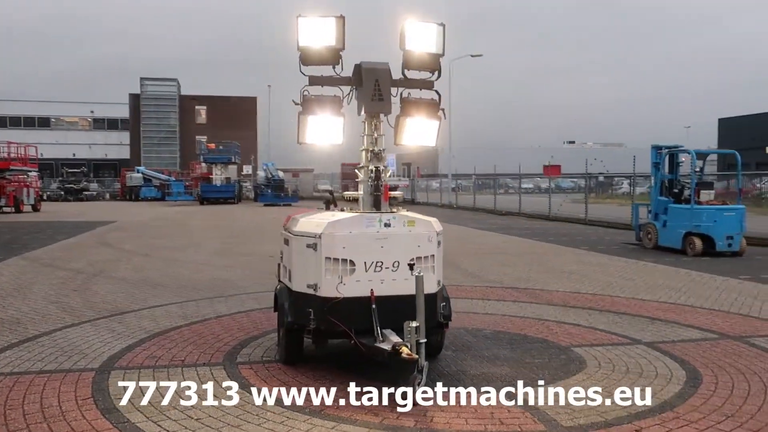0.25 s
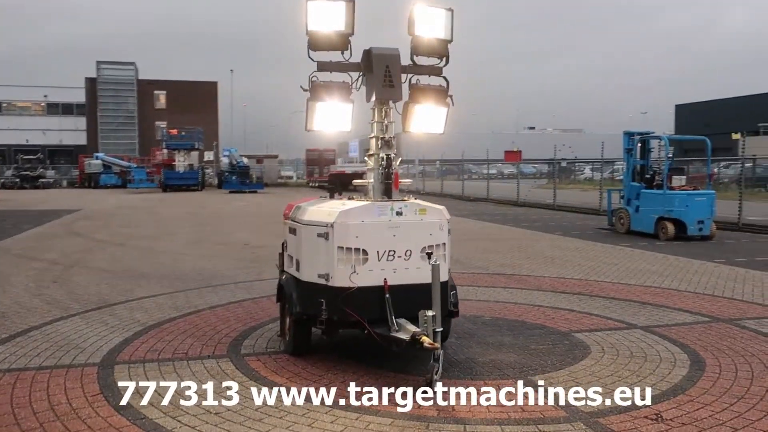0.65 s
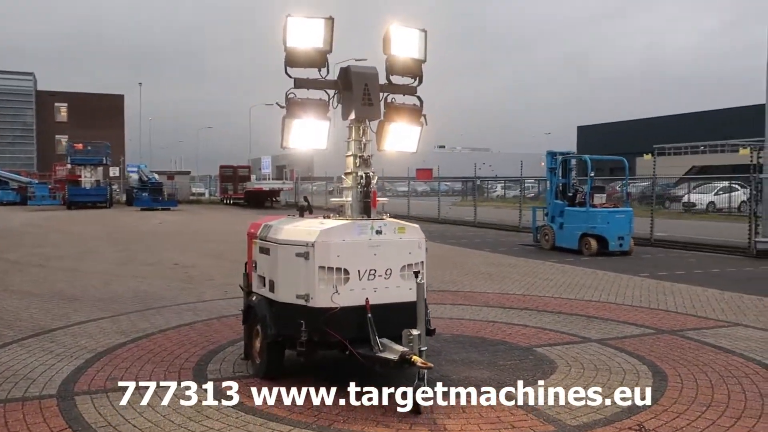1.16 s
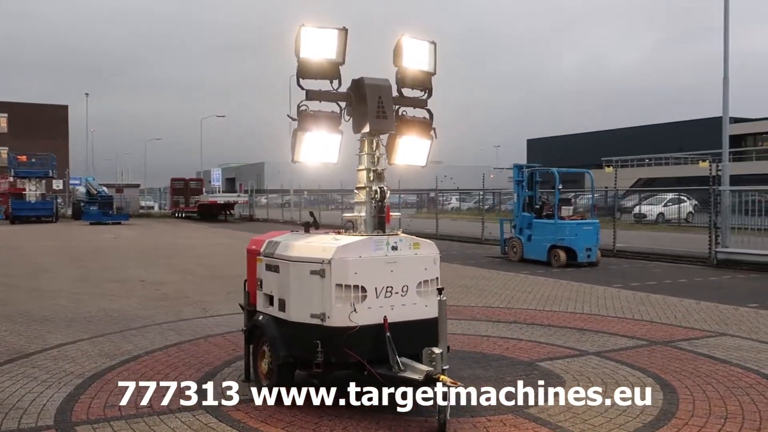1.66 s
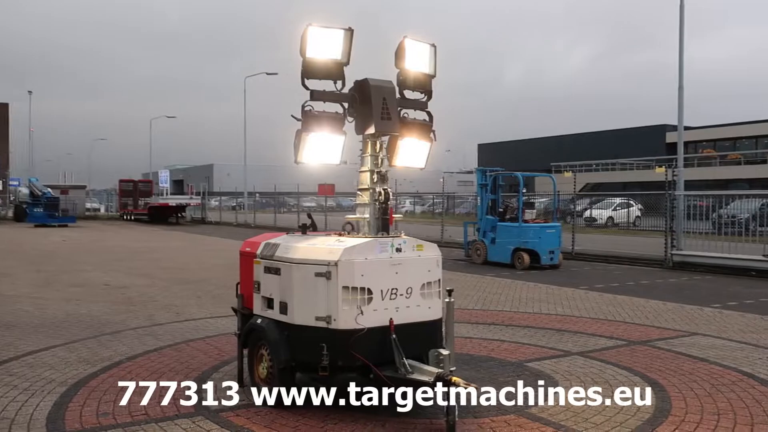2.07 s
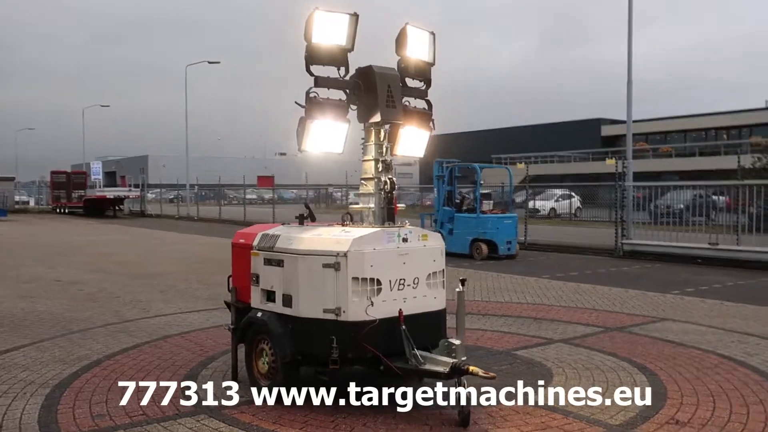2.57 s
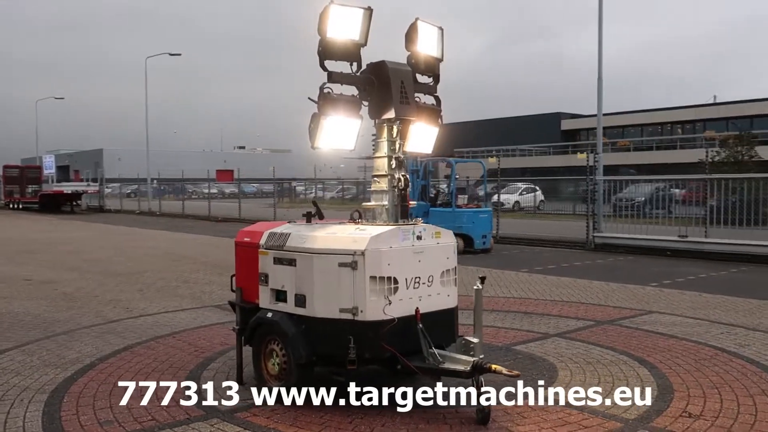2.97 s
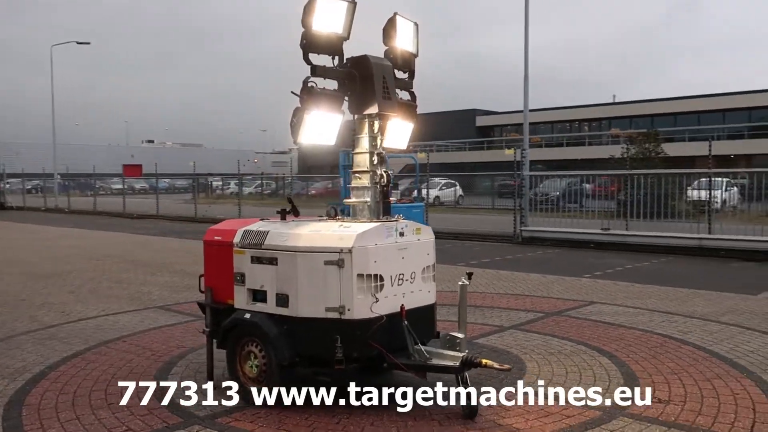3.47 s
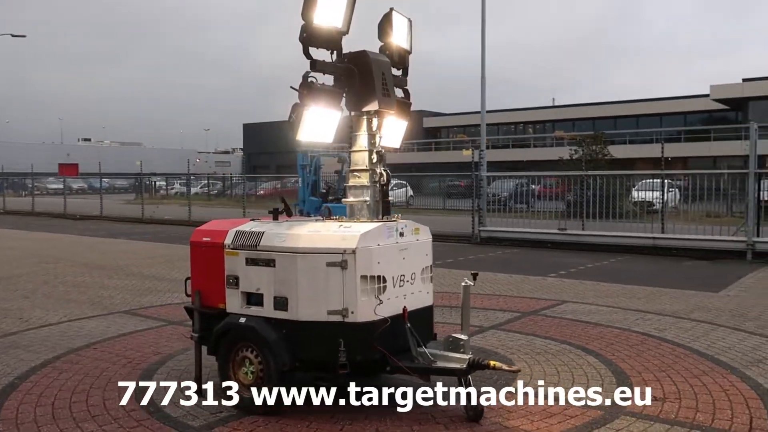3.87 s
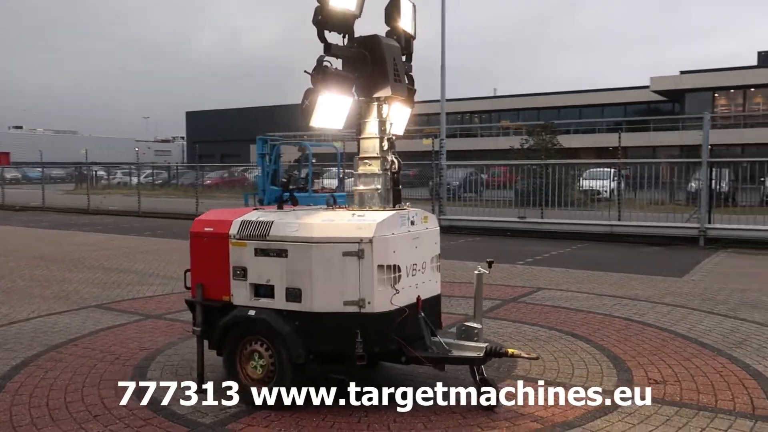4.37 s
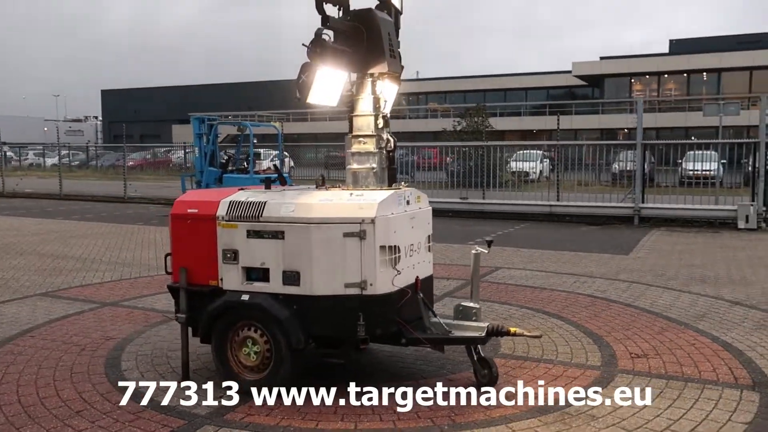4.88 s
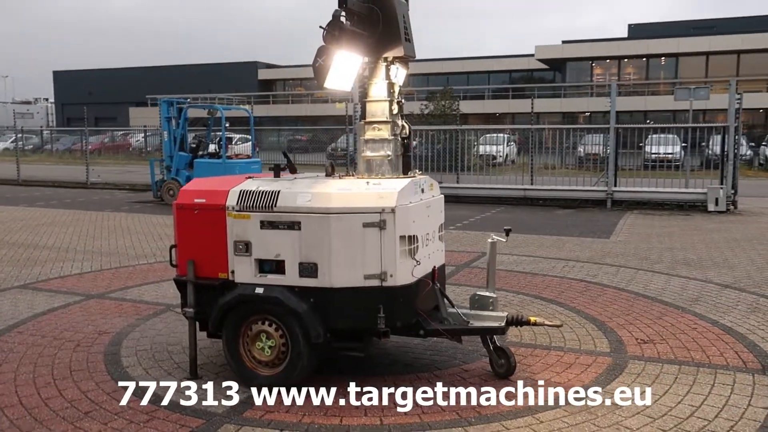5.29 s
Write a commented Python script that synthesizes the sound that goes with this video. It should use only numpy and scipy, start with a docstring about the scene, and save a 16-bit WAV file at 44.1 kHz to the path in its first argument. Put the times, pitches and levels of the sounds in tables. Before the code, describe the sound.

In an open yard, the small diesel of a towed light tower runs continuously at constant speed. Its buzzing low drone pulses about twenty-five times a second, with metallic ticking, knocks and hood drumming over a low rush of cooling air. A handheld stereo microphone moves slowly from front to side, gently shifting the tone and clatter.

```python
"""Diesel light tower at governed speed

The small diesel of a mobile light tower runs in an open yard, firing about 25 times a second.
Exhaust and intake pulses sum to harmonics of the firing rate, and sheet-metal hood panels resonate on them.
Each firing also modulates noise into clatter, drumming, ticks and knocks, over hiss and the rush of cooling air.
The microphone is carried slowly from the front round to the side, which shifts the levels and colours."""
import sys
import numpy as np
from scipy import signal
from scipy.fft import rfft, irfft
from scipy.io import wavfile

SR = 44100
rng = np.random.default_rng(int(sys.argv[2]) if len(sys.argv) > 2 else 0)


def master(y):
    """Save y as 16-bit WAV."""
    cut = np.clip(np.atleast_2d(y).T, -1, 1)
    pcm = np.round(cut * 32767)  # scale
    wavfile.write(sys.argv[1], SR, pcm.astype(np.int16))


N = 243873
TIME = np.arange(N) / SR  # s
HZ = np.fft.rfftfreq(N, 1 / SR)
STROKES = 145  # engine cycles for which random values are drawn; one firing in each cycle

# the governor hunts slightly about its set speed: time_s, firing_rate_hz
GOVERNED_SPEED = [(0.0, 24.98), (0.48, 24.997), (0.7, 24.952), (1.35, 25.003), (1.9, 24.994), (3.0, 24.946),
                  (3.5, 24.942), (3.85, 25.01), (4.2, 24.988), (4.55, 24.947), (5.0, 25.013), (5.53, 24.99)]
# the walk round the trailer: time_s, place (0 front, 1 corner, 2 side)
WALK_PATH = [(.7, 0.22), (1.3, 1.0), (2.25, 1.116), (3.2, 1.69)]
# nearness of the engine, told by the level of its clatter; only departures from the mean act: time_s, level_db
ENGINE_NEARNESS = [(0.15, -38), (0.8, -38), (1.3, -36), (2.2, -38), (3.2, -37), (3.8, -37.5), (4.3, -37),
                   (5.3, -37)]


def gain_of(db):
    """Level to amplitude: 20 dB is a factor of ten."""
    return 10 ** (np.asarray(db) / 20)


def evened(x):
    """Normalisation to unit rms, so that a later gain alone sets the level."""
    return x / np.sqrt(np.mean(x ** 2) + 1e-20)


def curve(rows, column=1):
    """Linear interpolation of one column of a timed table at every sample."""
    rows = np.asarray(rows)
    return np.interp(TIME, rows[:, 0], rows[:, column])


def read(points):
    """Interpolation of a spectrum table on a logarithmic frequency axis."""
    hz, value = np.transpose(points)
    return np.interp(np.log(HZ + 1), np.log(hz + 1), value)


def drift(rate_hz):
    """Low-pass filtered noise of unit rms; its spectrum falls to half amplitude at rate_hz."""
    points = 1024
    hz = np.fft.rfftfreq(points, TIME[-1] / points)
    slow = irfft(rfft(rng.standard_normal(points)) / (1 + (hz / rate_hz) ** 4))
    return evened(np.interp(TIME, np.linspace(0, TIME[-1], points), slow))


def strokes(cycles):
    """Cyclic variation: an independent normal value at each stroke, joined by straight lines."""
    return np.interp(cycles + 1, np.arange(STROKES), rng.standard_normal(STROKES))


def lobe(middle_s, length_s):
    """Directivity: one cosine arch of gain between two silent angles."""
    return np.cos(np.pi * np.clip((TIME - middle_s) / length_s, -.5, .5))


def nearness_gain(db_per_db):
    """Distance law: gain follows the departure of the nearness from its mean."""
    near_db = curve(ENGINE_NEARNESS)
    return gain_of(db_per_db * (near_db - near_db.mean()))


def carried(layer_carry):
    """Directivity and distance: the side facing the microphone and the nearness set a layer's gain."""
    front_db, corner_db, side_db, db_per_db = layer_carry
    facing_db = np.interp(curve(WALK_PATH), [0, 1, 2], [front_db, corner_db, side_db])
    return gain_of(facing_db) * nearness_gain(db_per_db)


def spread(pair, colour):
    """Partial coherence: two unrelated signals are coloured and become the middle and side of a stereo pair."""
    # left-right likeness: frequency_hz, likeness (0-1)
    likeness = [(100, 0.86), (600, 1), (1400, 0.93), (3000, 0.92), (5000, 0.49), (9000, 0.13),
                (14000, 0.31)]
    # left minus right: frequency_hz, difference_db
    balance = [(100, -4.5), (600, 1), (1300, 2.5), (2500, 0.5), (5000, 1.1), (14000, .1)]
    same = read(likeness)
    mid, side = rfft(pair) * gain_of(read(colour))
    side = side * np.sqrt((1 - same) / (1 + same))
    lean = gain_of(read(balance) / 2)
    channels = irfft(np.array([(mid + side) * lean, (mid - side) / lean]), N)
    return channels / np.std(channels.mean(0))


def rattle(cycles, blows, repeat, memory, uneven_db, between=1):
    """Cyclostationary noise: blows raise the power of a partly repeating noise in each engine cycle.

    repeat is the repeating share of power, memory its lifetime in cycles, between the power between blows."""
    number, place = np.floor(cycles).astype(int) + 1, cycles % 1
    fresh = rng.standard_normal((2, N))
    ringing = rng.standard_normal((2, STROKES, 1766))
    keep = np.exp(-1 / memory)
    for k in range(1, STROKES):
        ringing[:, k] = keep * ringing[:, k - 1] + np.sqrt(1 - keep ** 2) * ringing[:, k]
    pattern = ringing[:, number, (place * ringing.shape[2]).astype(int)]
    power = np.full(N, float(between))
    for at, strength, decay in blows:
        stroke = np.floor(cycles - at).astype(int) + 1
        force = gain_of(uneven_db * rng.standard_normal(STROKES))[stroke]
        power += strength * force ** 2 * np.exp(-((cycles - at) % 1) / decay)
    return np.sqrt(power) * (np.sqrt(repeat) * pattern + np.sqrt(1 - repeat) * fresh)


def pipe(table, orders, skirt_db, trail, linger=0, box_lag=0):
    """Fourier synthesis of one cycle of a pipe's ringing: its harmonic levels also govern its phase lags.

    trail is 1 as after a click and 0 when the ringing swells and fades alike."""
    linger_above = 7  # orders above this one ring on in the hood
    size = gain_of(np.array(table)[orders - 1, 1])
    log_gain = np.full(65, np.log(gain_of(skirt_db) * size.max()))
    log_gain[orders] = np.log(size)
    # the Hilbert transform of the log gain gives the minimum-phase lag;
    # the valve opens gradually, so the ringing trails less than after a click
    both_sides = np.r_[log_gain, log_gain[-2:0:-1]]
    lag = trail * signal.hilbert(both_sides).imag[orders]
    lag = lag + box_lag + linger * np.maximum(orders - linger_above, 0) ** 3
    turn = np.arange(1024) / 1024
    return size @ np.cos(2 * np.pi * np.outer(orders, turn) - lag[:, None])


def intake_and_exhaust(cycles):
    """Harmonic radiation by pulsed flow: each cycle the exhaust booms, then the intake sucks with a thump."""
    # levels of the orders from five sides, front to side: order (multiple of the firing rate), relative_db
    from_front = [(1, -17), (2, -8), (3, -6), (4, -19), (5, -7), (6, 0), (7, -4), (8, -5), (9, -9),
                  (10, -10), (11, -22)]
    from_corner = [(1, -15), (2, -4), (3, 0), (4, -19), (5, -8), (6, 0), (7, -5), (8, -11), (9, -17),
                   (10, -11), (11, -21)]
    from_door = [(1, -19), (2, -5), (3, -2), (4, -22), (5, -3), (6, 0), (7, -6), (8, -10), (9, -12),
                 (10, -15), (11, -31)]
    from_wheel = [(1, -22), (2, -7), (3, -9), (4, -20), (5, -8), (6, 0), (7, -7), (8, -11), (9, -16),
                  (10, -29), (11, -30)]
    from_side = [(1, -20), (2, -5), (3, -5), (4, -18), (5, -5), (6, 0), (7, -8), (8, -8), (9, -14),
                 (10, -24), (11, -24)]
    # the note from each side: time_s, level_db (before nearness and load),
    # thump_trail (0-1), linger (rad per cubed order)
    pipe_views = [(.45, -13.4, .75, .13), (1.5, -15.2, .3, .08), (2.8, -15.3, .35, .09),
                  (4.1, -15.3, .35, 0), (5.3, -14.5, .35, 0)]
    exhaust_opens, intake_opens = .105, .335  # place in the cycle, 0-1
    intake_lead = 0.014  # cycles per place of the walk: the intake is heard earlier from the side
    airbox_lag = 0.95  # rad: the air box delays the swing of the thump under its swell
    boom_uneven, thump_uneven = .11, .05  # share of strength
    stroke_jitter = .003  # cycles
    times, levels_db, trails, lingers = np.transpose(pipe_views)
    boom_at = cycles - exhaust_opens + stroke_jitter * strokes(cycles)
    thump_at = cycles - intake_opens + intake_lead * curve(WALK_PATH) + stroke_jitter * strokes(cycles)
    boom_force = 1 + boom_uneven * strokes(cycles)
    thump_force = 1 + thump_uneven * strokes(cycles - intake_opens)
    out = np.zeros(N)
    for view, table in enumerate([from_front, from_corner, from_door, from_wheel, from_side]):
        boom = pipe(table, np.arange(1, 4), skirt_db=-15, trail=.16)
        thump = -pipe(table, np.arange(4, 12), skirt_db=-35, trail=trails[view],
                      linger=lingers[view], box_lag=airbox_lag)
        turn = np.arange(len(boom)) / len(boom)
        note = boom_force * np.interp(boom_at, turn, boom, period=1)
        note += thump_force * np.interp(thump_at, turn, thump, period=1)
        facing = np.interp(TIME, times, np.arange(len(times)) == view)
        out += facing * gain_of(levels_db[view]) * evened(note)
    load = 1 + .025 * drift(2.9)  # slow wavering
    return out * nearness_gain(.29) * load


def throb(cycles, hz):
    """Amplitude modulation by damping: high panel notes die away between firings, low ones ring through."""
    depth = 0.36 * hz / 1e3
    loudest = 0.18  # place in the cycle, 0-1
    return evened(1 + depth * np.cos(2 * np.pi * (cycles - loudest)))


def panel_rings(cycles):
    """Forced resonance: hood panels ring on multiples of the firing rate, each within its own lobe."""
    # lobes that the microphone walks through: middle_s, length_s, frequency_hz (before rounding to the
    # nearest multiple), level_db (rms at the top of the arch)
    panel_lobes = [(1.8, 1.0, 275, -40.0), (0.2, 1.6, 300, -35), (1.55, 1.6, 300, -33),
                   (3.4, 1.8, 300, -39.5), (0.4, 2.2, 325, -32.5), (1.85, 1.9, 325, -30.5),
                   (4.1, 3.4, 325, -41.5), (1.15, 1.4, 350, -35.5), (2.3, 1.4, 350, -32.5),
                   (5.3, 4.4, 350, -41.0), (0.3, 2.8, 375, -42.0), (0.0, 1.2, 400, -38.5),
                   (1.5, 1.0, 400, -42.5), (0.9, 3.2, 425, -39.5), (4.5, 1.6, 425, -44.0),
                   (2.3, 4.4, 450, -39.5), (5.2, 3.0, 450, -41.0), (1.8, 3.0, 475, -39.0),
                   (1.2, 2.8, 500, -39.5), (5.4, 4.4, 500, -39.0), (0.6, 4.4, 550, -42.5),
                   (5.2, 3.2, 550, -41.0), (0.4, 4.4, 575, -36.5), (3.0, 2.2, 575, -42.5),
                   (5.5, 3.8, 575, -37.0), (2.3, 4.4, 650, -41.5), (5.3, 3.2, 650, -41.5),
                   (2.4, 4.4, 675, -39.5), (5.0, 2.0, 675, -41.0), (0.5, 4.4, 700, -35.5),
                   (3.7, 3.6, 700, -41.0), (1.2, 1.4, 725, -43.0), (3.9, 4.2, 725, -45.0),
                   (5.5, 2.0, 750, -41.0), (4.4, 2.0, 775, -42.5), (1.6, 2.4, 800, -41.5),
                   (5.5, 4.4, 800, -45.5), (2.8, 3.2, 825, -45.0), (2.1, 2.0, 850, -45.5),
                   (5.5, 4.4, 875, -44.5), (1.8, 2.2, 900, -46.0), (1.8, 4.4, 925, -45.0),
                   (4.35, 0.78, 1673, -43.5), (5.07, 0.8, 1673, -44.0)]
    struck = .4  # place in the cycle, 0-1
    waver, scatter = .17, 1.2  # rad: change from stroke to stroke, spread of starting phases
    firing_hz = np.mean(curve(GOVERNED_SPEED))
    tones = np.zeros(N)
    for middle_s, length_s, hz, db in panel_lobes:
        heard = abs(TIME - middle_s) < length_s / 2
        turn = cycles[heard]
        angle = 2 * np.pi * round(hz / firing_hz) * (turn - struck)
        angle += waver * strokes(turn) + scatter * rng.standard_normal()
        swell = lobe(middle_s, length_s)[heard] * throb(turn, hz)
        tones[heard] += gain_of(db) * swell * np.cos(angle)
    return np.sqrt(2) * tones


def raps(cycles):
    """Impulsive excitation: raps of injection and combustion swell and die at one place in every cycle."""
    # each is heard through one opening of the hood: middle_s, length_s, place (in the cycle, 0-1),
    # frequency_hz (at the starting speed), peak_db (for a stroke of mean strength)
    hard_raps = [(1.15, 2.0, .21, 2750, -35), (.6, 2.0, .26, 1600, -35), (1.8, 1.2, .18, 2450, -41),
                 (3.4, 1.3, .29, 1600, -40), (4.7, 2.0, .24, 1630, -31.5), (4.8, 1.6, .49, 1620, -36),
                 (4.9, 1.9, .16, 2600, -40)]
    rise, uneven, jitter = .05, .2, .0012  # swell time in cycles, share of strength, cycles
    out = np.zeros(N)
    for middle_s, length_s, place, hz, db in hard_raps:
        since = (cycles - place) % 1
        stroke = np.floor(cycles - place).astype(int) + 1
        force, slip = rng.standard_normal((2, STROKES))[:, stroke]
        swell = since / rise * np.exp(1 - since / rise) * (1 + uneven * force)
        tone = np.sin(2 * np.pi * hz * (since + jitter * slip) / GOVERNED_SPEED[0][1])
        out += gain_of(db) * lobe(middle_s, length_s) * swell * tone
    return out


def ticks_and_knock(cycles):
    """Impact noise: injector and valves tick sharply, the block answers combustion with a short ringing knock."""
    # blows in each cycle: place (0-1), power (relative), decay_cycles
    tick_blows = [(.2, .5, .09), (.25, .7, .11), (.47, .35, .17)]
    knock_blows = [(.26, 0.61, 0.16), (.54, 0.44, 0.11)]
    # what they ring with: frequency_hz, relative_db
    tick_colour = [(1200, -9), (2100, -1), (2480, 7.5), (2800, 3), (3050, -1), (3550, -2.5), (3880, 2.5),
                   (4300, -11.5), (7000, -18), (14000, -44)]
    knock_colour = [(1000, -37), (1380, -27), (1500, 10), (1600, -12.5), (1740, -6), (1900, 0), (2400, -39)]
    # escape through the vents toward the microphone: time_s, ticks_db, knock_db
    vent_levels = [(.2, -49.5, -50), (1.2, -47.5, -49), (2.0, -49.5, -53), (2.75, -47, -55),
                   (3.2, -53, -52), (3.8, -50, -54), (4.3, -48, -50), (5.4, -47, -46)]
    heard = cycles + .03 * curve(WALK_PATH)  # cycles earlier per place of the walk
    jittered = heard + .0005 * strokes(cycles)
    ticks = rattle(jittered, tick_blows, repeat=.6, memory=10, uneven_db=.9, between=0)
    knock = rattle(heard, knock_blows, repeat=.7, memory=6, uneven_db=.8, between=0)
    return (spread(ticks, tick_colour) * gain_of(curve(vent_levels, column=1))
            + spread(knock, knock_colour) * gain_of(curve(vent_levels, column=2)))


def round_side():
    """Change of aspect: 0 up to the corner, rising to 1 at the side."""
    return np.clip(curve(WALK_PATH) - 1, 0, 1)


def hood_drumming(cycles):
    """Structure-borne sound: each firing shakes the sheet-metal hood, which colours the noise by its side."""
    # blows in each cycle: place (0-1), power (relative to the noise between), decay_cycles
    drum_blows = [(0.17, 1.6, 0.064), (0.391, 3.8, 0.075)]
    # colours from front and side: frequency_hz, relative_db
    front_colour = [(160, -37), (270, -4), (333, -5.5), (375, -6.5), (528, -4.5), (562, -4), (612, -7),
                    (690, -2.5), (755, -8.5), (900, -10.5), (1050, -16), (1360, -62), (2310, -120)]
    side_colour = [(160, -42), (270, -5), (315, 4), (397, -1), (488, -3), (525, 3), (562, -6.5),
                   (609, -3.5), (666, -2.5), (800, -4), (1050, -9), (1360, -64), (2310, -120)]
    # how the layer carries: front_db, corner_db, side_db, follow (dB per dB of nearness)
    drum_carry = (-28.5, -29.5, -33.5, 0.84)
    drum = rattle(cycles, drum_blows, repeat=0.35, memory=6, uneven_db=0.7)
    side = round_side()
    hood = (1 - side) * spread(drum, front_colour) + side * spread(drum, side_colour)
    return hood * carried(drum_carry)


def mechanical_clatter(cycles):
    """Modulated broadband noise: independent front and side clatter crossfade at equal power."""
    # blows in each cycle: place (0-1), power (relative to the noise between), decay_cycles
    front_blows = [(0.211, 1.9, 0.32), (0.438, 1.6, 0.61)]
    side_blows = [(0.15, 0.67, 0.05), (.21, 0.37, 0.53), (.45, 1.2, .15)]
    # colours: frequency_hz, relative_db
    front_colour = [(560, -28), (950, -3.5), (1100, -7.5), (1210, -4), (1350, -9), (1740, -6.5),
                    (2040, -14), (2290, -11), (2490, -14), (2720, -10.5), (2990, -16), (3190, -15),
                    (3870, -17), (4400, -35.5), (5720, -40), (9680, -120)]
    side_colour = [(560, -1), (950, -35), (968, -7), (1040, -21), (1120, -2), (1310, -7), (1630, 1.5),
                   (1760, -17), (2090, -10.5), (2490, -11), (3130, -16), (3770, -18), (4400, -29),
                   (5720, -31), (9680, -120)]
    # how the layer carries: front_db, corner_db, side_db, follow (dB per dB of nearness)
    clatter_carry = (-37.5, -36.5, -37.5, 0.1)
    front = spread(rattle(cycles, front_blows, repeat=0.54, memory=8.8, uneven_db=2.5), front_colour)
    side = spread(rattle(cycles, side_blows, repeat=0.73, memory=6.7, uneven_db=3.5), side_colour)
    share = round_side()
    return (np.sqrt(1 - share) * front + np.sqrt(share) * side) * carried(clatter_carry)


def fine_hiss(cycles):
    """Filtered noise: a treble hiss pulses with the firings, and brighter bands swell along the walk."""
    # blows in each cycle: place (0-1), power (relative to the noise between), decay_cycles
    hiss_blows = [(0.126, .6, 0.74), (0.432, 1.1, 0.12)]
    # colour: frequency_hz, relative_db
    hiss_colour = [(2470, -43), (4200, 0), (5580, -8.5), (7690, -13.5), (8820, -14.5), (11300, -11),
                   (14100, -19.5), (14900, -23), (15500, -31)]
    # level before a common trim: time_s, level_db
    hiss_course = [(0.05, -53), (0.7, -53), (1.33, -49), (1.34, -49), (1.39, -50.5), (3.07, -52.5),
                   (3.21, -54.5), (3.94, -53.5), (5.43, -53.5), (5.45, -53)]
    # brighter bands: middle_s, length_s, frequency_hz, half_width_octaves (to -30 dB), level_db
    bright_bands = [(.3, 1.0, 11700, .07, -71.5), (4.93, 0.97, 6200, .8, -69.5), (2.1, 1.3, 10900, .3, -77)]
    trim_db = -1.5
    fine = rattle(cycles, hiss_blows, repeat=0.16, memory=6.8, uneven_db=1.0)
    hiss = spread(fine, hiss_colour) * gain_of(curve(hiss_course) + trim_db)
    for middle_s, length_s, hz, octaves, db in bright_bands:
        step = 2 ** octaves
        band = [(hz / step ** 2, -90), (hz / step, -30), (hz, 0), (hz * step, -30), (hz * step ** 2, -90)]
        hiss += spread(fine, band) * gain_of(db) * lobe(middle_s, length_s)
    return hiss


def cooling_air():
    """Flow noise: the low rush of the cooling air is steady random noise with a bass colour."""
    # colour: frequency_hz, relative_db
    air_colour = [(20, -50), (45, 2), (80, 16), (120, 11), (160, 10), (230, 10), (330, -20), (600, -37)]
    return spread(rng.standard_normal((2, N)), air_colour) * gain_of(-34)


def scene():
    """Phase locking: the tones and modulated noises follow one running count of engine cycles."""
    cycles = np.cumsum(curve(GOVERNED_SPEED)) / SR - .024
    tones = intake_and_exhaust(cycles) + panel_rings(cycles) + raps(cycles)
    port_lag_s = 1.6e-5  # the tones reach the left port first
    stereo_tones = np.array([tones, np.interp(TIME - port_lag_s, TIME, tones)])
    impacts = ticks_and_knock(cycles) + mechanical_clatter(cycles) + hood_drumming(cycles)
    return stereo_tones + impacts + fine_hiss(cycles) + cooling_air()


def record(dry):
    """Band limitation: a linear-phase low-pass filter removes the extreme treble."""
    edge_hz = 15200
    low_pass = signal.firwin(511, edge_hz, window=("kaiser", 9), fs=SR)
    return signal.oaconvolve(dry, low_pass[None], "same")


dry = scene()
out = record(dry)
master(out)
```